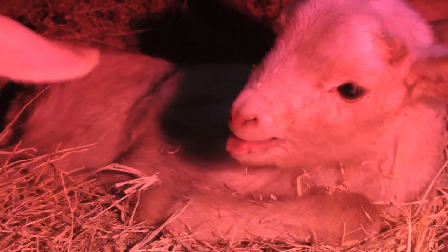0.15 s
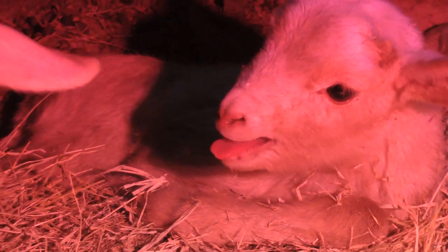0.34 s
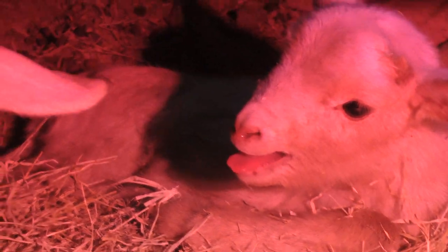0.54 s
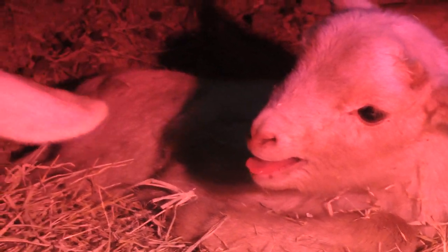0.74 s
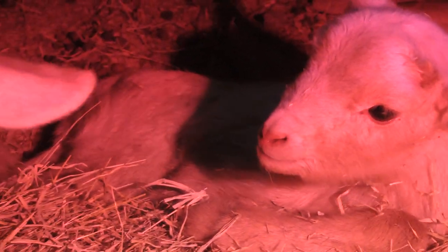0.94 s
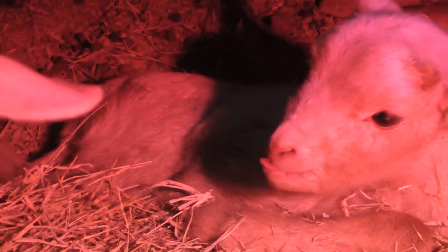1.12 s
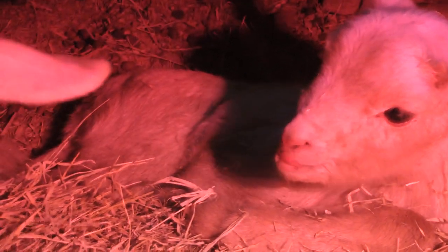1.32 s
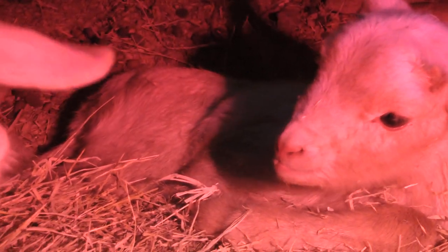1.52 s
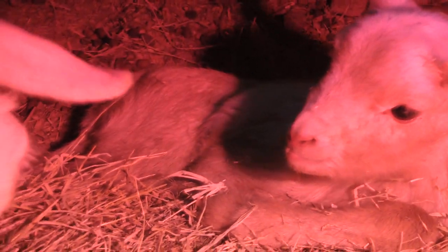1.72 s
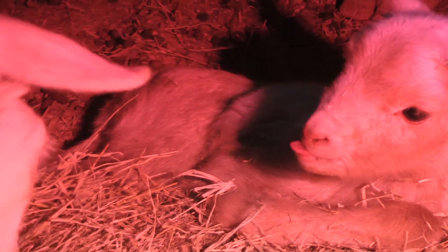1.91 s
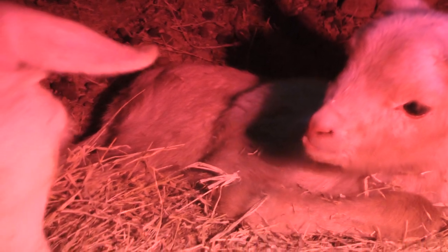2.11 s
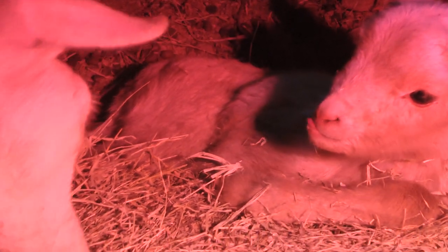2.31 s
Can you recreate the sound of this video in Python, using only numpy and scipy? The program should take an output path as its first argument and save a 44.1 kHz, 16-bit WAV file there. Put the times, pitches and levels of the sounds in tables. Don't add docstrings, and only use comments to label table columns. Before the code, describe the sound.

A young lamb close to the microphone gives one bright, fast-quavering bleat under a second long, its mouth closing to a hum; afterwards straw rustles, ticks and snaps over faint barn rumble and hiss.

```python
import sys
import numpy as np
from scipy import signal
from scipy.fft import rfft, irfft
from scipy.io import wavfile
from scipy.ndimage import uniform_filter1d

SR = 44100
rng = np.random.default_rng(int(sys.argv[2]) if len(sys.argv) > 2 else 0)


def generate_wav(signal):
    frames = np.transpose(np.atleast_2d(signal))
    scaled = np.clip(frames, -1, 1) * 32767
    pcm = np.round(scaled).astype(np.int16)
    wavfile.write(sys.argv[1], SR, pcm)


def rack_gain(trim_db):
    fader = np.asarray(trim_db, float)
    return 10 ** (fader / 20)


N = 103635

# frequency in Hz, level in dB per Hz.
AIR_SPECTRUM = [(22, -33), (60, -4.5), (193, -2), (500, -18), (1100, -27), (2600, -17.5), (9000, -25.5),
                (16400, -32)]
# frequency in Hz, correlation from -1 to 1.
EAR_LIKENESS = [(60, 0.61), (130, 0.96), (290, 0.28), (640, 0.14), (1410, 0.69), (3100, 1), (6820, 0.94),
                (15000, 1)]
AIR_DB, HISS_FLICKER_DB = -62, 1.6

# frequency in Hz, rms level in dB, width in Hz.
MOTOR_LINES = [(124.5, -70, 25), (403.7, -76, 2), (807.5, -71.5, 5), (1453, -85, 6)]

# start in seconds, length in seconds, level in dB, centre in Hz, width in octaves.
RUSTLES = [(0, 0.34, -74, 3550, 0.68), (0.144, 0.055, -64.5, 2800, 0.91), (0.879, 0.14, -66.5, 2300, 0.75),
           (1.0, 0.07, -67, 6500, 1.2), (1.088, 0.11, -62, 5530, 1.06), (1.183, 0.26, -68.5, 4600, 0.75),
           (1.329, 0.15, -66.5, 2920, 0.54), (1.416, 0.15, -66, 3400, 0.86),
           (1.603, 0.25, -70.5, 4300, 0.64), (1.737, 0.18, -68.5, 2970, 0.47),
           (1.88, 0.23, -65, 4600, 0.94), (1.999, 0.066, -63, 4350, 0.44), (2.05, 0.13, -68.5, 4080, 0.7),
           (2.168, 0.19, -70.5, 3500, 0.59), (1.43, 0.04, -81, 630, .3), (1.866, 0.029, -74, 11000, 0.72),
           (1.353, 0.086, -72, 10000, 1.4)]
GRAINS_PER_S, GRAIN_SPREAD_DB, GRAIN_CYCLES, CLUMP_DB = 14000, 1.8, 1.8, 2

# start in seconds, peak in dB, lowest pitch in Hz.
TICKS = [(.1532, -43, 2500), (.1615, -44, 2500), (.172, -48, 1500), (.187, -50, 2500), (.21, -53, 3000),
         (1.023, -52, 7000), (1.039, -46, 3500), (1.066, -42, 2000), (1.114, -44, 3000), (1.13, -46, 3000),
         (1.303, -49, 2000), (1.401, -50, 3000), (1.5305, -43.5, 1200), (1.532, -47, 2500),
         (1.5346, -45, 2500), (1.5356, -42, 3500), (1.675, -48, 3500), (1.872, -50, 8000),
         (1.945, -48, 6000), (2.092, -46, 5000), (2.127, -51, 5500), (2.216, -49, 6000)]
TICK_S, TICK_TILT = 0.00084, 0.57

# start in seconds, peak in dB, ring in Hz, decay in cycles.
SNAPS = [(.154, -42, 2360, 1.8), (.167, -33, 2900, 1.24), (1.065, -36.5, 5130, 1.8), (1.113, -52, 3180, 2),
         (1.13, -49, 2900, 2), (1.289, -52.5, 830, 1.8), (1.438, -39.5, 2980, 1.4), (1.528, -41, 3060, 3),
         (1.5302, -37, 4800, 3.7), (1.5306, -35, 2100, 1.4), (1.5343, -44.5, 450, 1.06),
         (1.5306, -44.5, 1010, 1.2), (1.694, -40, 3550, 1), (1.707, -54.5, 775, 2.5),
         (1.806, -37.5, 2180, 0.9), (1.819, -39, 3040, 1.4), (1.836, -38, 2220, 1.05),
         (1.901, -43, 4200, 1.3), (2.007, -46, 4300, 4.1), (2.063, -42, 4400, 4.5), (2.092, -48, 4500, 3),
         (2.124, -51.5, 2400, 10.2)]
SNAP_CRACK_DB, SNAP_CRACK_S = -19.5, 0.004

# crest in seconds, crest pitch in Hz, slack in seconds, slack pitch in Hz.
QUAVERS = [(.243, 302, .256, 274), (.271, 297, .278, 294), (.298, 324, .318, 293), (.325, 296, .342, 253),
           (.363, 316, .379, 294), (.394, 317, .411, 279), (.430, 314, .443, 301), (.461, 318, .481, 286),
           (.496, 305, .509, 295), (.530, 317, .550, 279), (.565, 304, .582, 277), (.601, 307, .621, 269),
           (.635, 290, .652, 259), (.672, 296, .691, 263), (.709, 292, .726, 256), (.746, 289, .766, 246),
           (.788, 280, .806, 260), (.824, 278, .843, 237), (.857, 251, .866, 247), (.886, 252, .903, 229)]
START_S, STOP_S, START_HZ, STOP_HZ = .2275, .9125, 225, 240
# time in seconds, effort in dB, mouth closing from 0 to 1.
EFFORT = [
    (.229, -31, 0.12),
    (.30, -27.5, 0.05),
    (.46, -26, 0.07),
    (.56, -26.5, 0.27),
    (.68, -28, 0.35),
    (.79, -30.5, 0.61),
    (.85, -33.5, 0.79),
    (.87, -37, 0.99),
    (0.913, -43, 0.97),
]
# crest in dB, slack in dB.
BELLY_PUSH = [(0.45, 1), (0, 0.5), (1.1, 0.5), (0.2, -3), (0.4, .3), (0.7, 0.2), (0.3, 0.7), (0.9, 0.2),
              (.3, 0.8), (0.4, -0.3), (0.6, 0.7), (-0.2, 1), (0.4, -0.2), (0.5, 0.7), (0, -.3),
              (-0.1, -0.3), (0.8, 1.7), (0.7, -0.6), (-0.5, -1.1), (0.8, -0.5)]
FORCE = [.2, .3, .5, .3, .2, .4, .2, 1.4, .1, 1.4, .7, .9, 1, 1.2, 1.2, 1.2, .6, .3, .2, .2]
UPPER_FORCE = [.7, .3, 1.3, .4, 1, 1.1, 1.3, 1, 1.1, .9, 1.1, 1, 1.1, 1, 1.1, 1, 1, .9, .5, .4]
CREST_RING = [0, 0, 1, 0, 0, 2, 0, 11, 0, 9, 4, 6, 5, 8, 7, 7, 6, 4, 2, 0]
QUAVER_LAG_S, QUAVER_DEEPENS, LOW_RING_SHARE = 0.0027, 0.24, .4
JITTER, SHIMMER_DB, BREATH = .003, 1.1, .04

# open in Hz, closing in Hz, width in Hz, open level in dB, closing level in dB.
THROAT = [(1560, 1470, 237, -10.5, -3.5), (2300, 2180, 660, -13, -9.5), (3736, 3920, 285, -4.5, -8),
          (4780, 4340, 550, -9, -11.5), (5378, 5295, 159, 4, -6), (6350, 6480, 280, -8.5, -12.5),
          (7400, 6960, 610, -18, -11), (8640, 8350, 670, -28, -23.5), (1625, 1660, 88, -16, -1.5),
          (3826, 3900, 85, -17, -2)]
# open, closing in dB per Hz of pitch rise.
SWELL = [(.05, .14), (.02, 0), (.03, .14), (.24, .14), (.11, .02), (-.08, .25), (.3, .04), (.22, .02),
         (.15, .3), (.2, .35)]
# open, closing in Hz per Hz of pitch rise.
SLIDE = [(-.5, -.5), (0, 0), (1.5, 1.5), (9, 6), (.5, .5), (3, -6), (-3, -22), (-3, -8), (2.5, 2.5),
         (.8, .8)]
LIPS_SHUT = [-5, 5, -11, 2.5, 3, 1.5, 1.5, 6.5, -26, 4.5]
SHUT_S, SHUT_TAKES_S, NARROWED_AT = 0.858, .008, .3
THROAT_CUT_HZ, THROAT_TOP_HZ = 1088, 9500
WANDER, FLICKER_DB = .005, 1.1
# frequency in Hz, width in Hz, open level in dB, closing level in dB.
AIRY_BANDS = [(9480, 1300, -32, -36), (12800, 2800, -36, -37), (14500, 910, -46, -38)]
# frequency in Hz, width in Hz, open share, closing share,
# climb in Hz per Hz of pitch rise.
HOLLOWS = [(2950, 300, .1, .75, .5), (8800, 400, .4, .6, 3), (7150, 500, .7, .8, 22)]
# multiple of the pitch, open level in dB, closing level in dB.
CHEST = [(1, -38, -21.5), (2, -34, -24.5), (3, -34.5, -17), (4, -53, -21), (5, -52, -21)]
CHEST_SHUT_DB, CHEST_SWELL = 3, .08
# frequency in Hz, width in Hz, level in dB.
SIDEWAYS = [(380, 700, -11), (8550, 1600, -14.5)]

# delay in seconds, left level in dB, right level in dB.
ECHOES = [(.0011, -16, -17.5), (.0027, -21, -11), (.0049, -26.5, -17), (.0083, -23, -35)]
TAIL_DB, TAIL_T60_S = -34, .15


def evened(x):
    return x / np.sqrt(np.mean(x ** 2) + 1e-20)


def smooth_noise(shape, size):
    return evened(uniform_filter1d(rng.standard_normal(shape), size=size))


def read(points, hz):
    f, value = np.transpose(points)
    return np.interp(np.log(hz + 1), np.log(f + 1), value)


def add(mix, s, sound):
    part = mix[..., round(s * SR):][..., :sound.shape[-1]]
    part += sound[..., :part.shape[-1]]


def resonate(x, hz, width, part=np.imag):
    turn = np.exp(2j * np.pi * np.cumsum(hz * np.ones(len(x))) / SR)
    r = np.exp(-np.pi * width / SR)
    return 2 * part(turn * signal.lfilter([1 - r], [1, -r], x / turn))


def resonate_twice(x, hz, width, part=np.imag):
    return resonate(resonate(x, hz, width, part), hz, width)


def between(start, end, share):
    return start + (end - start) * share


def air():
    hz = np.fft.rfftfreq(N, 1 / SR)
    same = np.clip(read(EAR_LIKENESS, hz), -1, 1)
    a, b = rfft(rng.standard_normal((2, N)))
    shaped = np.array([a, same * a + np.sqrt(1 - same ** 2) * b]) * rack_gain(read(AIR_SPECTRUM, hz))
    low = irfft(shaped * (hz < 5500), N)
    high = irfft(shaped * (hz >= 5500), N)
    flicker = rack_gain(HISS_FLICKER_DB * smooth_noise(N, 1500))
    return rack_gain(AIR_DB) * evened(low + high * flicker)


def whine():
    t = np.arange(N) / SR
    out = np.zeros(N)
    for hz, db, width in MOTOR_LINES:
        steady = np.sqrt(2) * np.sin(2 * np.pi * hz * t)
        waver = evened(resonate(rng.standard_normal(N), hz, width))
        fade = rack_gain(-4 * (width > 20) * t / t[-1])
        out += rack_gain(db) * evened(steady + (0.38 + width / 25) * waver) * fade
    return out


def rustle():
    t = np.arange(N) / SR
    out = np.zeros((2, N))
    pitches = np.geomspace(500, 15500, num=32)
    clumps = rack_gain(CLUMP_DB * smooth_noise(N, 500))
    size = rack_gain(GRAIN_SPREAD_DB * np.minimum(rng.exponential(1, N), 4))
    size = size * (rng.random(N) < GRAINS_PER_S / SR) * clumps
    kind = rng.integers(0, len(pitches), N)
    sides_db = rng.normal(0.53, 1.0, len(pitches))
    swells = np.array([rack_gain(db) * np.sin(np.pi * np.clip((t - s) / length, 0, 1) ** 0.56)
                       for s, length, db, *_ in RUSTLES])
    for k, hz in enumerate(pitches):
        u = t[:900] * hz
        grain = u * np.exp(-u / GRAIN_CYCLES) * np.sin(2 * np.pi * u)
        grains = evened(signal.oaconvolve(size * (kind == k), grain)[:N])
        share = np.array([np.exp(-(np.log2(hz / mid_hz) / wide) ** 2) / wide for *_, mid_hz, wide in RUSTLES])
        level = np.sqrt(share @ swells ** 2 / 4)
        out += grains * level * rack_gain(np.array([[1], [-1]]) * sides_db[k])
    return out


def ticks():
    out = np.zeros((2, N))
    t = np.arange(500) / SR
    for (s, db, low_hz), noise in zip(TICKS, rng.standard_normal((len(TICKS), 2, len(t)))):
        burst = (noise[0] + .25 * noise) * np.exp(-t / TICK_S)
        burst = signal.lfilter([1], [1, -TICK_TILT], burst)
        burst = signal.sosfilt(signal.butter(2, low_hz, "high", fs=SR, output="sos"), burst)
        add(out, s, rack_gain(db) * burst / abs(burst).max())
    return out


def snaps():
    out = np.zeros(N)
    t = np.arange(600) / SR
    noise = rng.standard_normal((len(SNAPS), len(t)))
    for (s, db, hz, cycles), crack in zip(SNAPS, noise):
        ring = np.minimum(t * hz, 1) * np.exp(-t * hz / max(cycles, .3)) * np.sin(2 * np.pi * hz * t)
        crack = evened(resonate_twice(crack, hz, 2 * hz)) * np.exp(-t / SNAP_CRACK_S)
        add(out, s, rack_gain(db) * (ring + rack_gain(SNAP_CRACK_DB) * crack))
    return out


def belly(t, closing):
    turn_s, turn_hz = np.transpose([(START_S, START_HZ), *np.reshape(QUAVERS, (-1, 2)), (STOP_S, STOP_HZ)])
    turn_number = np.arange(len(turn_s))
    crest_s = turn_s[1:-1:2]
    place = np.interp(t, turn_s, turn_number)
    eased = np.floor(place) + .5 - .5 * np.cos(np.pi * (place % 1))
    hz = np.interp(eased, turn_number, turn_hz)
    belly_db = np.interp(eased, turn_number, np.pad(np.ravel(BELLY_PUSH), 1, mode="edge"))
    rise = hz - uniform_filter1d(hz, size=3200, mode="nearest")
    rise = np.interp(t - QUAVER_LAG_S, t, rise) * (1 + QUAVER_DEEPENS * closing)
    push = rise * np.interp(t, crest_s, FORCE)
    upper = rise * np.interp(t, crest_s, UPPER_FORCE)
    crest = .5 - .5 * np.cos(np.pi * np.interp(t - QUAVER_LAG_S, t, eased))
    ring_db = crest ** 2 * np.interp(t, crest_s, CREST_RING)
    return hz, belly_db, push, upper, ring_db


def vocal_folds(turns):
    pulses = -evened(sum(np.cos(2 * np.pi * k * turns) for k in range(1, 56))) * (turns > -1 / 20)
    puffs = evened(np.exp(-(turns % 1) / 0.82) * rng.standard_normal(len(turns)))
    return pulses, puffs


def throat(drive, closing, shut, push, upper, ring_db, drift):
    out = np.zeros(len(drive))
    narrowed = np.minimum(closing / NARROWED_AT, 1) ** 2
    for k, (open_hz, closing_hz, width, open_db, closing_db) in enumerate(THROAT):
        force = upper if 2 < k < 8 else push
        hz = between(open_hz, closing_hz, closing) + between(*SLIDE[k], narrowed) * force
        db = between(open_db, closing_db, closing) + between(*SWELL[k], narrowed) * force
        db = db + FLICKER_DB * (drift[-k] - 1) / WANDER + LIPS_SHUT[k] * shut
        db = db + ring_db * {8: LOW_RING_SHARE, 9: 1}.get(k, 0)
        sign = -1 if k < 8 and k % 2 else 1
        out += sign * rack_gain(db) * resonate(drive, hz * drift[k], width)
    band = signal.butter(4, [THROAT_CUT_HZ, THROAT_TOP_HZ], "band", fs=SR, output="sos")
    return signal.sosfilt(band, out)


def airy_top(breathy, closing, drift):
    out = np.zeros(len(breathy))
    for (hz, width, open_db, closing_db), d in zip(AIRY_BANDS, drift):
        db = between(open_db, closing_db, closing) + 260 * (d - 1)
        out += rack_gain(db) * resonate_twice(breathy, hz * d ** 3, width)
    return out


def hollowed(voice, closing, upper):
    for mid_hz, width, open_share, closing_share, climb in HOLLOWS:
        share = np.clip(between(open_share, closing_share, closing), 0, 1)
        voice = voice - share * resonate(voice, mid_hz + climb * upper, width, np.real)
    return voice


def chest_hum(turns, closing):
    return sum(rack_gain(between(open_db, closing_db, closing)) * np.sin(2 * np.pi * round(k) * turns)
               for k, open_db, closing_db in CHEST)


def bleat():
    t = np.arange(START_S, STOP_S + .02, 1 / SR)
    s, effort_db, closing = np.transpose(EFFORT)
    closing = np.clip(np.interp(t, s, closing), 0, 1)
    shut = np.clip((t - SHUT_S) / SHUT_TAKES_S, 0, 1)
    hz, belly_db, push, upper, ring_db = belly(t, closing)
    drift = 1 + WANDER * smooth_noise((len(THROAT), len(t)), 900)
    jitter, shimmer = smooth_noise((2, len(t)), 150)
    turns = np.cumsum(hz * (1 + JITTER * jitter)) / SR - 1 / 8
    voiced = (t < STOP_S) * rack_gain(np.interp(t, s, effort_db) + belly_db + SHIMMER_DB * shimmer)
    pulses, puffs = vocal_folds(turns)
    breathy = voiced * rack_gain(0.042 * push) * (pulses + puffs)
    voice = throat(voiced * (pulses + BREATH * puffs), closing, shut, push, upper, ring_db, drift)
    voice = hollowed(voice + airy_top(breathy, closing, drift), closing, upper)
    chest_level = voiced * (t > START_S + .004) * rack_gain(CHEST_SHUT_DB * shut + CHEST_SWELL * push)
    chest = uniform_filter1d(chest_level, size=300) * chest_hum(turns, closing)
    out = np.zeros(N)
    add(out, START_S, rack_gain(10.5) * voice + chest)
    return out


def pen(x):
    t = np.arange(SR // 4) / SR
    tail = rng.standard_normal((2, len(t))) * rack_gain(-60 * t / TAIL_T60_S) * (t > .01)
    taps = rack_gain(TAIL_DB) * tail / np.linalg.norm(tail[0])
    taps[:, 0] = 1
    for s, left_db, right_db in ECHOES:
        taps[:, round(s * SR)] += rack_gain([left_db, right_db])
    return signal.fftconvolve(x[None], taps, axes=1)[:, :N]


def scene():
    lamb = bleat()
    side = sum(rack_gain(db) * resonate_twice(lamb, hz, width, np.real) for hz, width, db in SIDEWAYS)
    voice = pen(lamb) + side * np.array([[-1], [1]])
    straw = pen(snaps()) * rack_gain([[.4], [-.4]]) + rustle() + ticks()
    return voice + straw + air() + whine() * rack_gain([[-1.2], [1.2]])


def band_limit(x):
    return signal.sosfilt(signal.butter(12, 16750, fs=SR, output="sos"), x)


def record(dry):
    edge = signal.firwin(511, 16720, window=("kaiser", 9), fs=SR)
    mix = signal.oaconvolve(dry, edge[None], "same")
    return band_limit(mix)


dry = scene()
out = record(dry)
generate_wav(out)
```